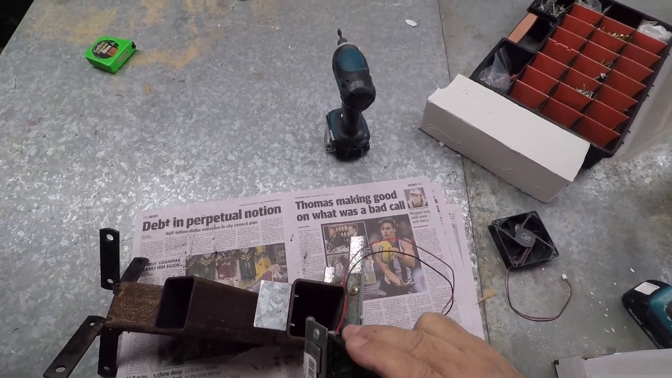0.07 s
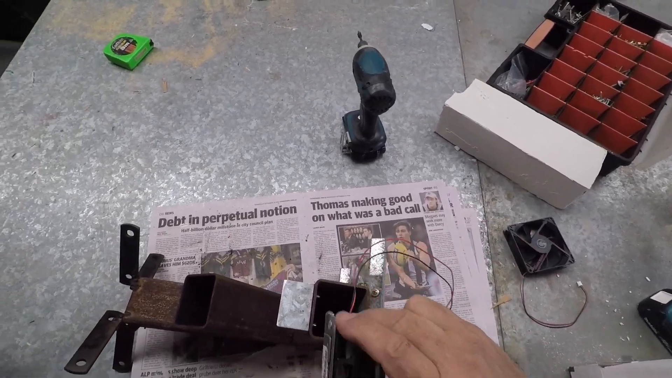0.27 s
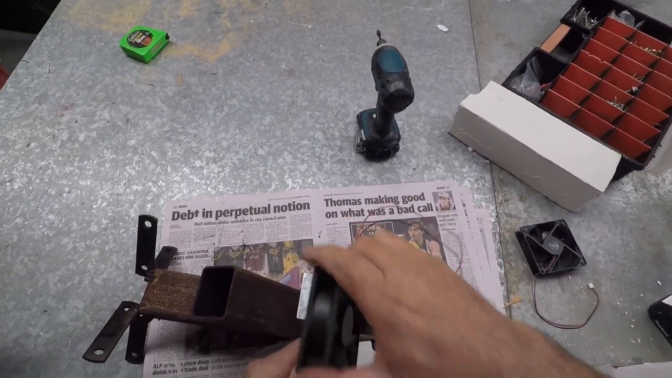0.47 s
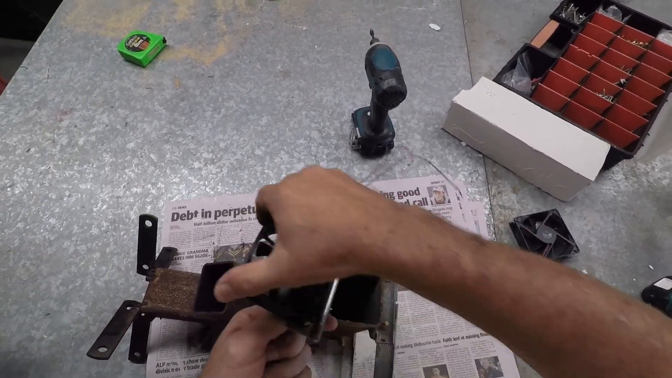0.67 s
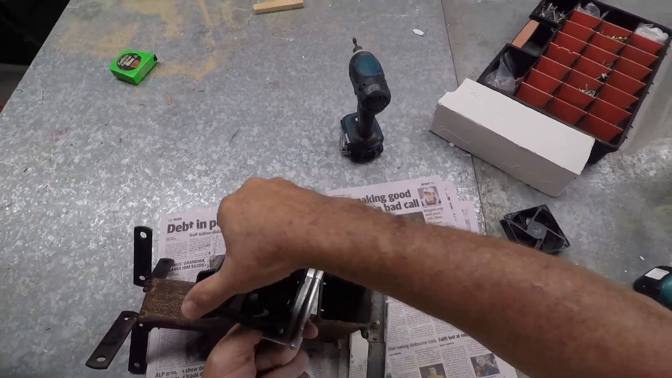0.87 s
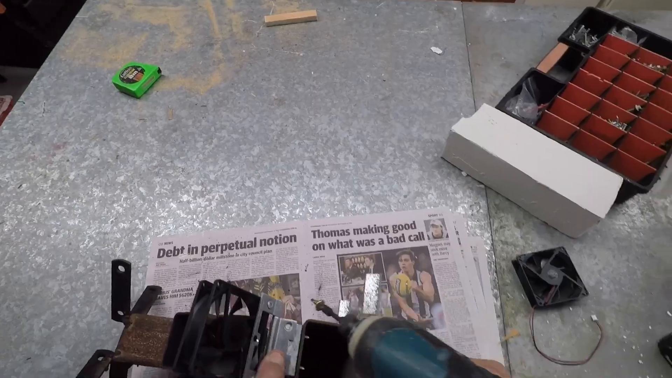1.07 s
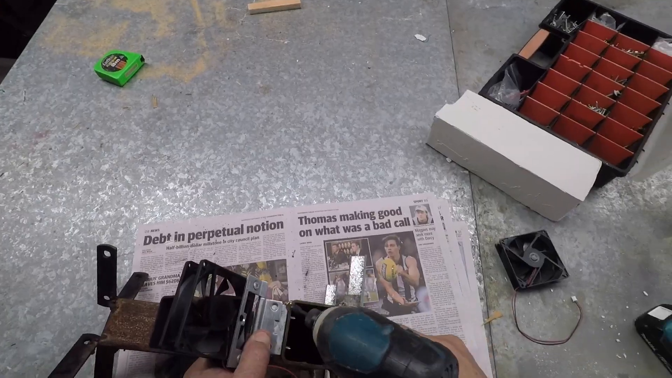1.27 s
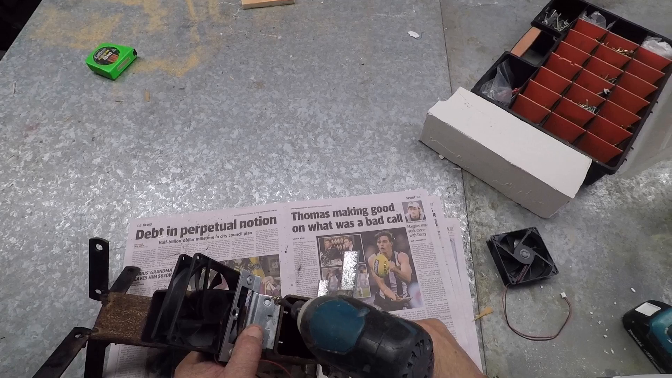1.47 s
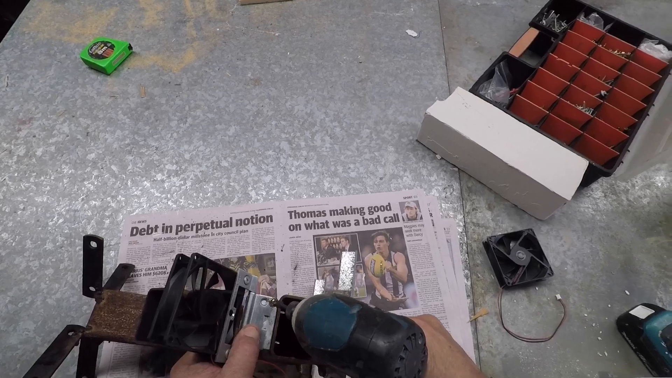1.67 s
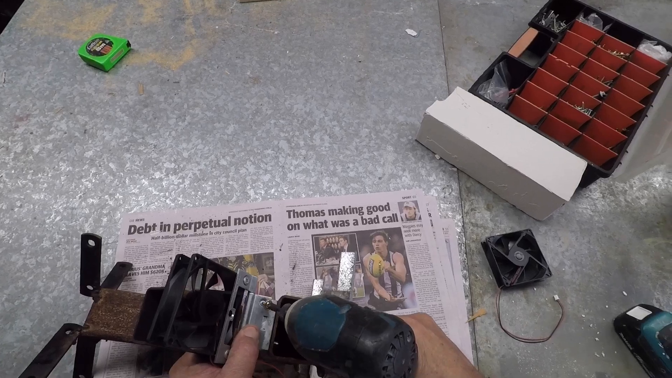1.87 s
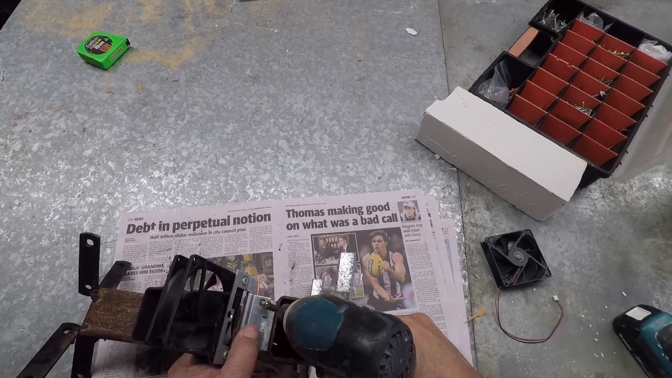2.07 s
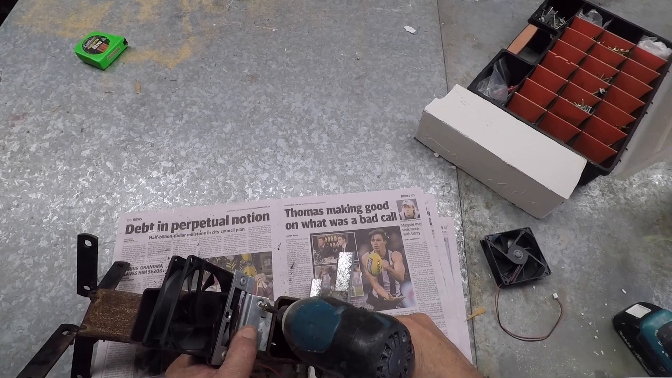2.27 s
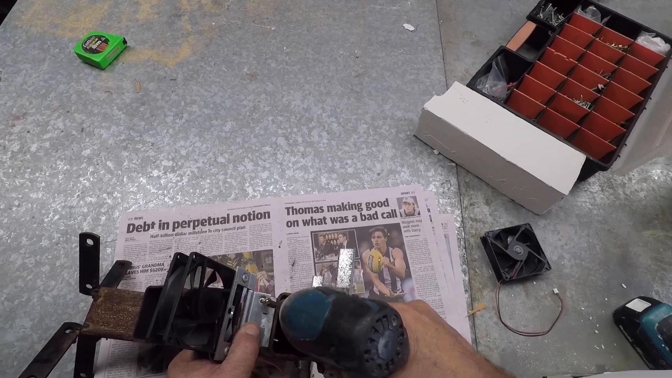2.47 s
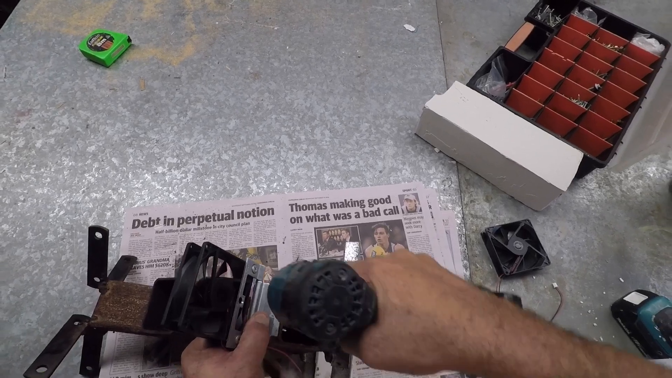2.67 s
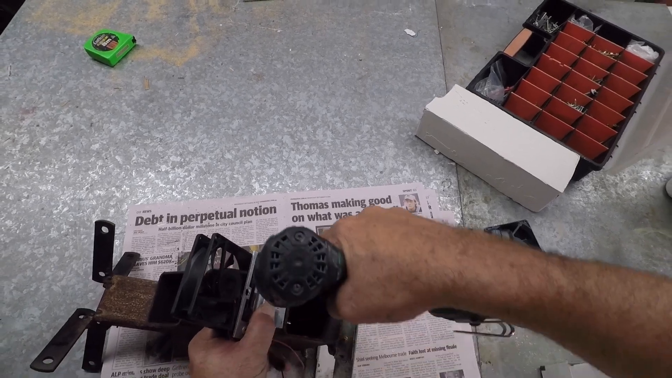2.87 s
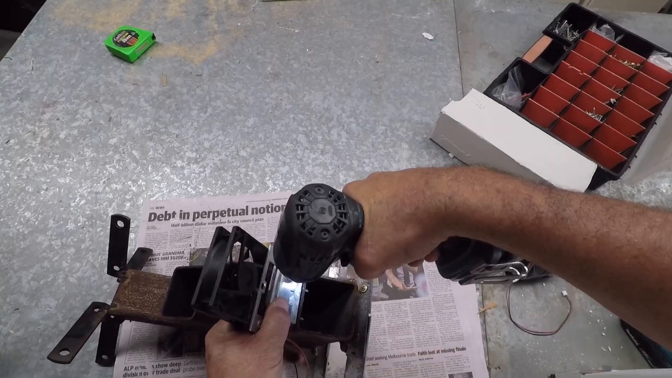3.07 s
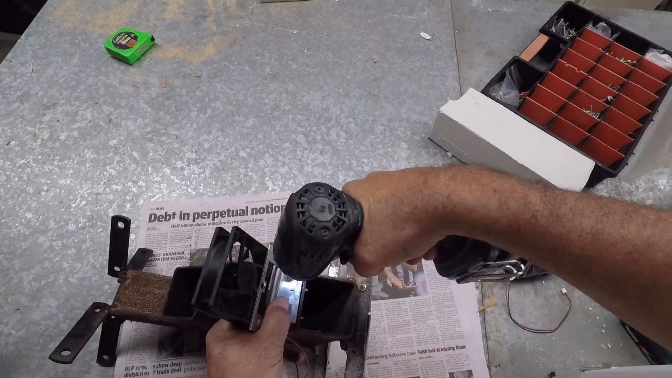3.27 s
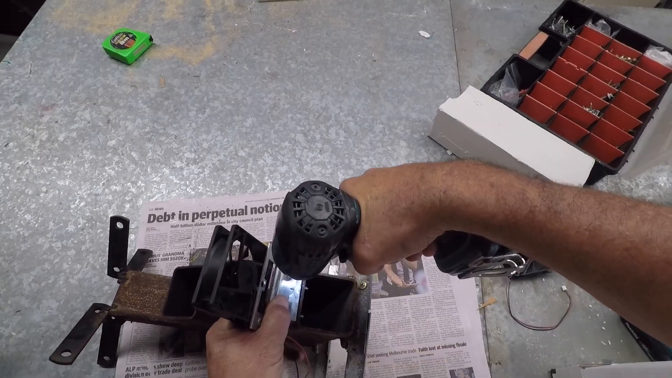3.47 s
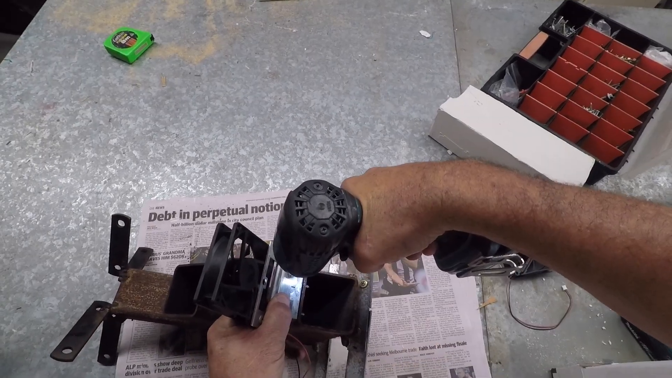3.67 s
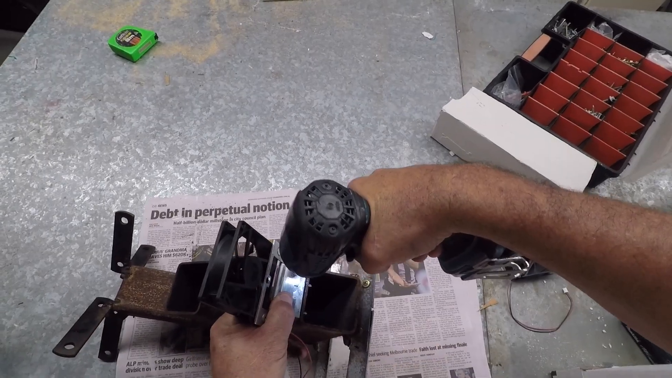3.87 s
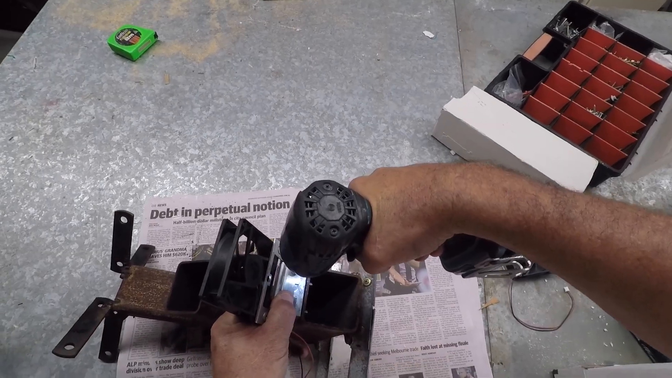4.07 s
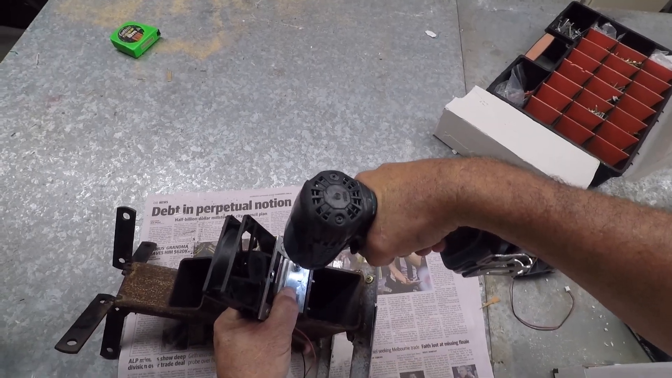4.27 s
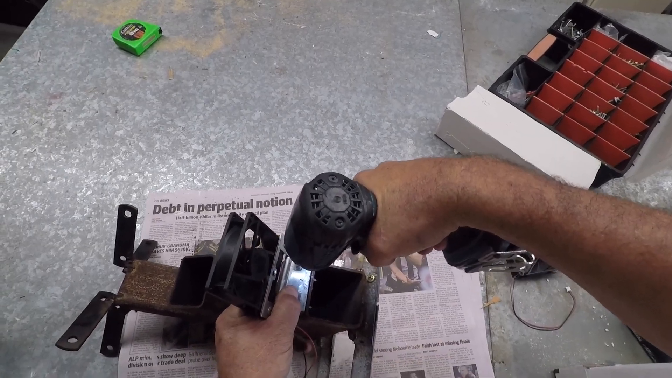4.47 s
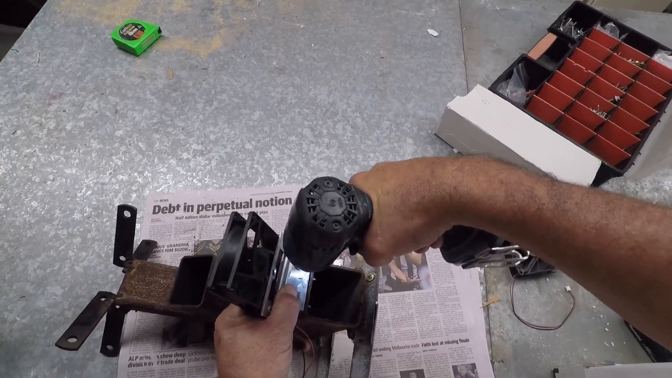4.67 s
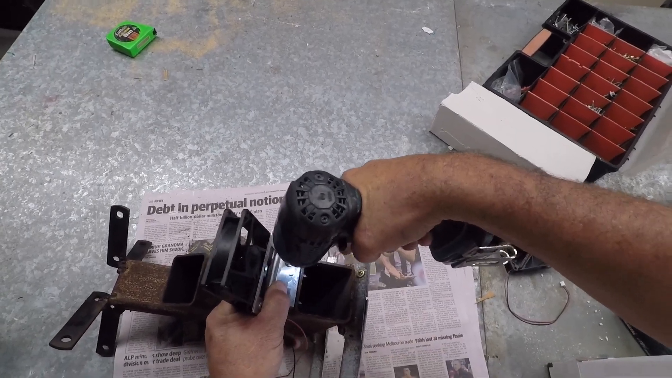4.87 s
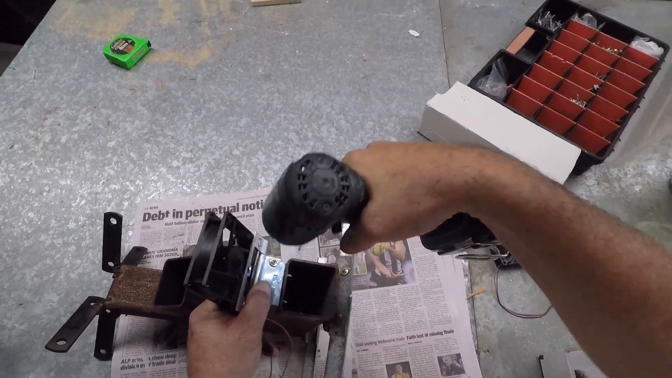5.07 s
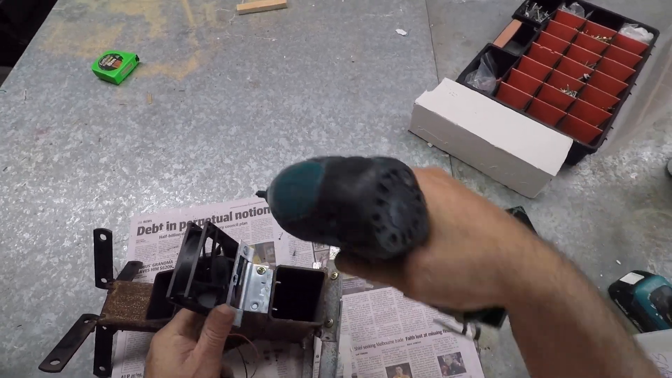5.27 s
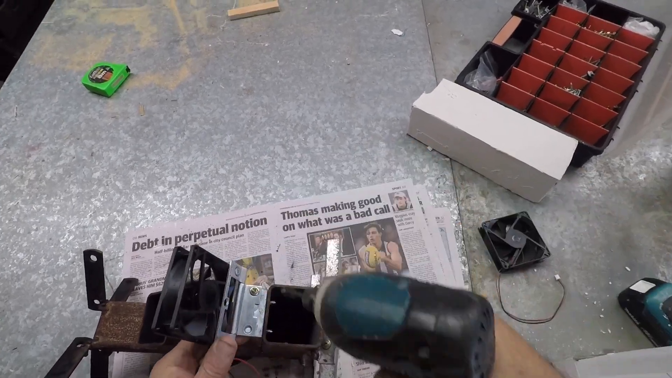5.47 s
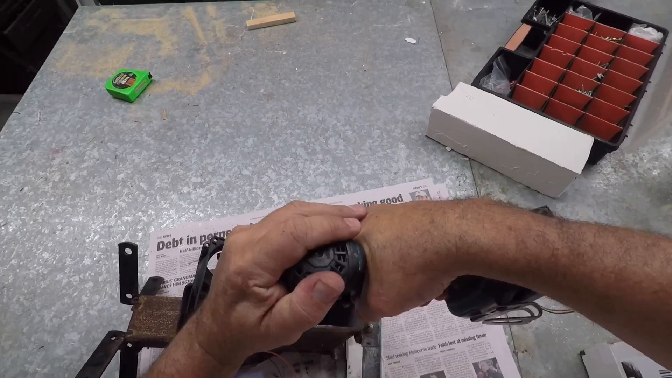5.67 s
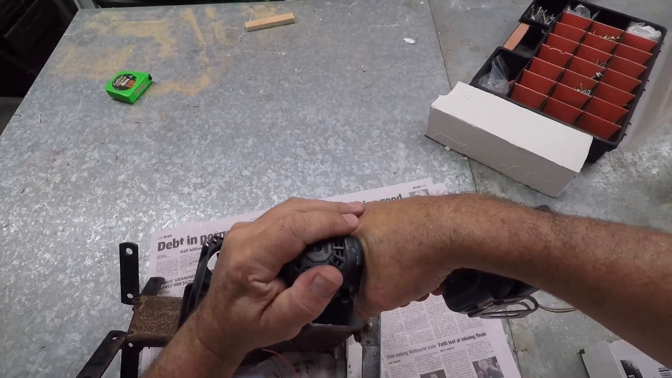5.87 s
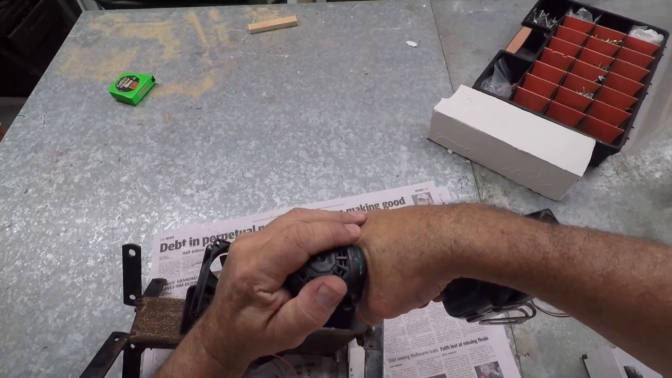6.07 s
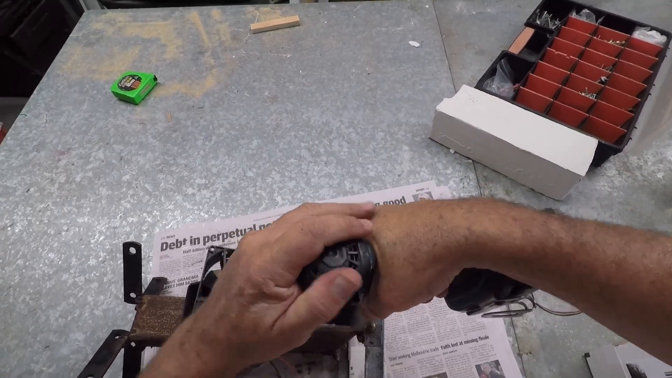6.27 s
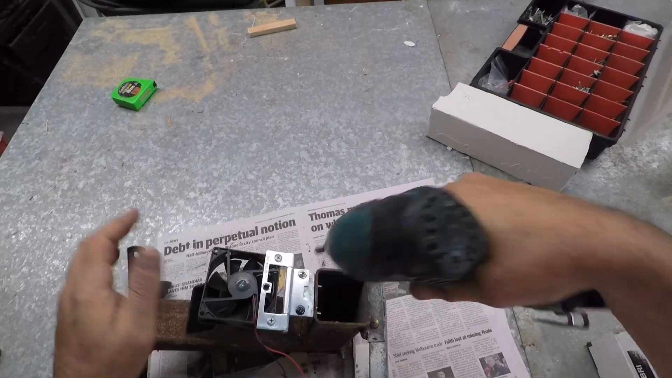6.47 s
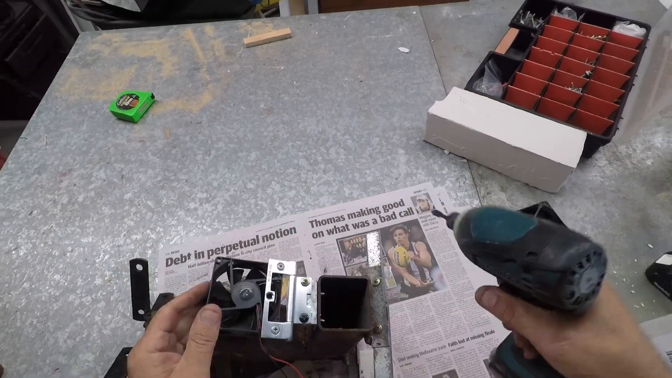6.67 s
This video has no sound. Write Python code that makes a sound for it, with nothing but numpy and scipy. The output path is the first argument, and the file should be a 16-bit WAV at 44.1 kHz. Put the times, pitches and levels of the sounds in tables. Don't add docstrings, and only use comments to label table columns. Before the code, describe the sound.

Soft workshop hum and faint hiss lie alone until about 0.95 seconds, when a steel latch touches and snaps shut, bright and short, cut by a quick dip in sound. Hum continues with tiny ticks near 1.9 and 2.2 seconds. At 3.0, after another brief fade, the air grows duller and closer and a cordless driver whines: steady planetary gear tones over gritty rattle and low bench rumble. Its pitch slowly sinks, sagging more as the screw binds around 4.5. From 4.6 to 4.85 the clutch slips in about ten rapid snaps, bracket knocks and deep bench thumps, then stops. Light taps fill the pause, one clearer near 5.55. After a fade at 5.6 a second, lower, rougher run begins, sags, catches around 5.9 and rises, then ends in heavy, duller clutch clacks from 6.1 to 6.25. Short echoes die away; a few faint metallic taps follow until 6.7.

```python
import sys
import numpy as np
from scipy import signal
from scipy.fft import rfft, irfft, next_fast_len
from scipy.io import wavfile
from scipy.ndimage import uniform_filter1d

SR = 44100
rng = np.random.default_rng(int(sys.argv[2]) if len(sys.argv) > 2 else 0)


def unload_audio(sound):
    columns = np.transpose(np.atleast_2d(sound))
    steps = np.round(np.clip(columns, -1, 1) * 32767)
    wavfile.write(sys.argv[1], SR, steps.astype(np.int16))


def linear_from_db(decibels):
    return 10 ** (np.asarray(decibels, float) / 20)


N = 296307
T = np.arange(N) / SR

CUTS = [.984, 2.983, 5.583]
# [time_s, snap_db, bench_thump_db, bracket_knock_db, knock_pitch_hz]
SLIPS = [(4.5898, -22.5, -22, -27, 1490), (4.602, -20, -13, -26, 1340), (4.6297, -22, -15, -20, 1820),
         (4.6558, -22, -15.5, -27, 1670), (4.683, -22.5, -23, -26, 1810),
         (4.7096, -22.5, -15.5, -29.5, 1760), (4.7335, -21.5, -13.5, -31, 2000),
         (4.765, -24, -9, -22, 1758), (4.795, -22.5, -13.5, -15, 1652), (4.833, -30.5, -12.5, -23, 1890)]
SLIPS_AGAIN = [(5.916, -31, -24, -23, 2190), (5.9608, -47, -26, -41, 1210),
               (6.0774, -18.5, -11, -13.5, 1550), (6.1043, -21, -15.5, -14, 1832),
               (6.1293, -21, -13, -17.5, 1460), (6.153, -22, -20, -12.5, 1520),
               (6.1795, -20, -9.5, -14.5, 1195), (6.2032, -49, -12, -15.5, 1370),
               (6.2343, -30.5, -8.5, -12, 1574)]
# [frequency_hz, density_db]
SNAP = [(180, -49), (300, -2), (544, -19), (631, -6), (1110, -4), (1470, 3.5), (2250, -4), (4160, 1),
        (4820, -4.5), (5880, -1.5), (11400, -38), (13400, -16), (15600, -53)]
# [frequency_hz, width_hz, gain_db]
PORT = [(11450, 520, -13.5), (12100, 660, 5.5), (13700, 700, 3.5), (14900, 1200, 3)]


def evened(x):
    return x / np.sqrt(np.mean(x ** 2) + 1e-20)


def read(points, hz):
    f, value = np.transpose(points)
    return np.interp(np.log(hz + 1), np.log(f + 1), value)


def add(mix, s, sound):
    part = mix[round(s * SR):][:len(sound)]
    part += sound[:len(part)]


def humped(hz, humps):
    return sum(top / (1 + (2 * (hz - f) / width) ** 2) for f, width, top in humps)


def colour(x, points, humps=()):
    size = next_fast_len(len(x))
    hz = np.fft.rfftfreq(size, 1 / SR)
    db = read(points, hz) + humped(hz, humps)
    return evened(irfft(rfft(x, size) * linear_from_db(db), size)[:len(x)])


def drift(size, hz):
    return evened(signal.lfilter([1], [1, -np.exp(-2 * np.pi * hz / SR)], rng.standard_normal(size)))


def ring(modes, detune, seconds):
    t = np.arange(round(seconds * SR)) / SR
    out = np.zeros(len(t))
    for (hz, db, t60), off in zip(modes, detune):
        out += linear_from_db(db - 60 * t / t60) * np.sin(2 * np.pi * hz * off * t)
    return out


def room(x):
    # [frequency_hz, t60_s]
    shop = [(100, 0.52), (500, 0.42), (2000, 0.41), (8000, 0.31), (11000, 0.35), (14000, 0.29)]
    echoes = np.zeros(SR)
    at = np.arange(200, SR - 20, 20)
    echoes[at + rng.integers(0, 20, len(at))] = rng.choice([-1., 1.], len(at))
    hz, t, z = signal.stft(echoes, SR, nperseg=256)
    fall = linear_from_db(-60 * t / read(shop, hz)[:, None])
    tail = signal.istft(z * fall, SR, nperseg=256)[1]
    return signal.fftconvolve(x, tail / np.linalg.norm(tail))[:N]


def workshop():
    # [frequency_hz, density_db]
    hum_colour = [(20, -34), (106, -33), (135, -1), (200, 0), (310, -7), (500, -13.5), (1000, -20.5),
                  (2000, -25.5), (3300, -34), (6500, -36), (8500, -33), (10500, -34), (13000, -41),
                  (15500, -50)]
    # [frequency_hz, density_db]
    close_colour = [(59, -25.5), (100, 0.5), (166, -16), (313, -14.5), (370, -21), (420, -21.5), (697, -30),
                    (936, -29), (1520, -31.5), (2470, -39), (4660, -41), (6660, -51.5), (15500, -67)]
    # [frequency_hz, width_hz, gain_db]
    steel = [(1500, 150, 5), (1830, 60, 8), (2200, 150, 4), (3000, 160, 9), (3800, 150, 4), (4650, 200, 8)]
    sway_db = [-62.5, -85, -42, -37]
    # [time_s, level_db, rise_s, fall_s]
    leans = [
        (0.97, -57, .03, .02),
        (2.97, -70, .06, .05),
        (3.1, -37, 0.056, .06),
        (4.5, -32, 0.34, 0.084),
        (4.73, -23, 0.031, .05),
        (5.3, -43, 0.062, 0.054),
        (5.95, -36, 0.09, 0.06),
    ]
    hum = linear_from_db(-48.5 + 0.51 * drift(N, 3.2)) * colour(rng.standard_normal(N), hum_colour)
    close = linear_from_db(-43 + 0.92 * drift(N, 7.3)) * colour(rng.standard_normal(N), close_colour, steel)
    sway = colour(rng.standard_normal(N), [(12, 0.0), (25, 0.5), (80, -1), (120, -17.5), (200, -53)])
    level = linear_from_db(np.take(sway_db, np.searchsorted(CUTS, T)))
    for s, db, rise, fall in leans:
        level = level + linear_from_db(db) * np.exp(-abs(T - s) / np.where(T < s, rise, fall))
    sway *= level * linear_from_db(2.6 * drift(N, 1.8))
    return np.where(T < CUTS[1], hum, close) + sway


def small_parts():
    # [frequency_hz, level_db, t60_s]
    latch_modes = [(1150, -9, 0.15), (1830, -2, 0.19), (2680, -15, 0.32), (3660, -5, 0.26),
                   (5520, 1, 0.086), (6200, -16, 5.0), (7820, -10, 0.012), (10100, -13, 0.032),
                   (12510, -14, 0.059)]
    # [time_s, level_db]
    latch_hits = [
        (0.9498, -44),
        (0.9612, -17),
    ]
    # [time_s, level_db, pitch_hz]
    tap_hits = [(1.9052, -38, 4200), (2.167, -53, 1510), (2.9602, -44, 4200), (5.0205, -42, 1860),
                (5.0734, -36.5, 1510), (5.4041, -47, 2050), (5.5627, -28.5, 1970), (6.354, -36, 1440),
                (6.421, -35.5, 1260), (6.5117, -42, 1420), (6.6708, -40.5, 1560)]
    latch, taps = np.zeros(N), np.zeros(N)
    t = np.arange(round(.04 * SR)) / SR
    for s, db in latch_hits:
        grit = colour(rng.standard_normal(len(t)), SNAP, [(1400, 630, -8), (10500, 2200, 16), (14500, 2000, 16)])
        grit *= np.exp(-t / 0.065)
        tone = ring(latch_modes, rng.uniform(0.96, 1.01, 9), .04)
        onset = 1 - np.exp(-t / 0.00042)
        add(latch, s, (linear_from_db(db - 4.5) * tone + linear_from_db(db - 8.0) * grit) * onset)
    for s, db, hz in tap_hits:
        grit = colour(rng.standard_normal(len(t)), SNAP) * np.exp(-t / .006)
        tone = (1500 / hz) ** 2 * np.sin(2 * np.pi * hz * t) * np.exp(-t / .004)
        onset = 1 - np.exp(-t / .0004)
        add(taps, s, linear_from_db(db - 1.5) * (.35 * grit + 1.2 * tone) * onset)
    add(taps, .99, linear_from_db(-68) * ring([(3700, 0, .6), (3790, -2, .5), (3860, -5, .4)], [1, 1, 1], .3))
    return latch * (T < CUTS[0]), taps


def clutch():
    # [frequency_hz, level_db, t60_s]
    bench = [(74.6, -10, 0.099), (109.5, -0.5, 0.24), (145.4, 3, 0.2), (185, -7.5, 0.13),
             (249, -3.5, 0.075), (399.5, -4.5, .08), (529, 1.5, 0.033)]
    # [ratio to the knock pitch, level_db, t60_s]
    bracket = [(.42, -4, .03), (.55, -4, .025), (1., 0, .014), (2.4, -4, .012), (2.9, -3, .015)]
    snap_colour = [(3000, -19), (8000, 2.5), (11400, -6.5), (13800, -4.5), (15600, -3.5)]
    out, t = np.zeros(N), np.arange(round(0.029 * SR)) / SR
    for s, snap_db, thump_db, knock_db, hz in SLIPS + SLIPS_AGAIN:
        snap = colour(rng.standard_normal(len(t)), snap_colour, PORT) * np.exp(-t / .003)
        palm_db = -4 * (s > CUTS[2])
        add(out, s, linear_from_db(snap_db + 1.5 + palm_db) * snap)
        scrape = colour(rng.standard_normal(len(t)), SNAP, PORT)
        scrape *= (1 - np.exp(-t / .003)) * np.exp(-t / .008)
        add(out, s - .005, linear_from_db(snap_db + 13.5) * scrape)
        knock = ring(bracket, hz * rng.uniform(0.94, 1.04, 5), 0.069)
        add(out, s - .0045, linear_from_db(knock_db + 3.5) * knock)
        u = ((t - .008) / 0.0021) ** 2
        add(out, s - .005, linear_from_db(thump_db + 1) * (1 - 2 * u) * np.exp(-u))
        add(out, s - .004, linear_from_db(thump_db - 9) * ring(bench, rng.uniform(0.92, 1.149, 7), .4))
    return out


def driver(k):
    # [time_s, ring_mesh_hz, gear_load_db]
    runs = [
        [(2.983, 1452, -6), (3.2, 1428, -4), (3.75, 1413, -3), (3.9, 1386, -1), (4.2, 1367, 1.5),
         (4.3, 1355, 0), (4.45, 1333, 1), (4.52, 1253, 0), (4.58, 1217, -3)],
        [(5.583, 1056, -4.5), (5.72, 1008, -4), (5.82, 978, -5), (5.895, 909.6, -0.5), (5.915, 1060, -5),
         (5.95, 1054, 0), (5.975, 1212, 3.5), (6.0, 1264, 2.5), (6.06, 1238, 3)],
    ]
    # [ring_tone_db, sun_tone_db, tooth_rattle_db, bench_rumble_db]
    levels = [
        (-32.5, -32.5, -18.5, -26),
        (-34.5, -36.5, -20.5, -28.5),
    ]
    # [trigger_off_s, end_s, rattle_db, judder_above_thumps_db]
    slipping = [
        (4.79, 4.86, -19, 6),
        (6.215, 6.26, -17, 4),
    ]
    ring_load = [0.092, .6]
    sun_load = [1, 1.8]
    rattle_load = [0.096, 0.34]
    bite_load = [-0.089, -.2]
    waver = [.0015, .005]
    grind_db = [24, 14]
    ring_harmonics = [(0, -13, -10, -24, -32, -40, -42, -40), (-1, 1, 1, 1, -5, -4, -22, -13)]
    ring_throb = [.45, 1., .9, .9, .7, .7, .7, .6]
    ring_fuzz = [(-8, -7, -2, -10, -13, -21, -27, -26), (-4, -2, -2, -1, -5, -5, -18, -11)]
    sun_harmonics = [(-1, 2.5, -1, -28, -23, -18, -36, -40), (0, 2, -2, -10, -24, -24, -24, -14)]
    # [frequency_hz, width_hz, gain_db]
    whine = [(2120, 200, 3), (4520, 500, 6), (6750, 700, 5), (10000, 500, 13), (12500, 800, 6)]
    # [frequency_hz, density_db]
    housings = [
        [(150, -51), (250, -16.5), (614, -12), (1030, -18), (1380, -9), (1730, -9), (2200, -12.5),
         (2400, -13.5), (4390, -2.5), (5130, -6.5), (6540, -3), (7640, -20.5), (11400, -25), (13300, -19),
         (15500, -27)],
        [(150, -43), (250, -33), (335, -18), (781, -10.5), (995, -9.5), (1410, -5), (1990, -3), (2280, -5.5),
         (2900, -8.5), (3450, -12), (4170, 2), (6210, -4), (11400, -25.5), (12600, -14.5), (15500, -29)],
    ]
    # [frequency_hz, width_hz, gain_db]
    shell = [(620, 150, 6), (1400, 300, 3), (2000, 400, 3), (2850, 200, 4), (3430, 250, 7), (4200, 400, 2),
             (10000, 500, 4)]
    chuck_harmonics = [(-8.5, -4.5, -7, -11.5, -2, -6.5, -14.5, -11.5),
                       (-2, -9, -6, -11, -8, -8, -8.5, -12)]
    # [frequency_hz, width_hz, gain_db]
    sheet = [(140.6, 6, 6.5), (27.1, 2, 8)]
    # [frequency_hz, density_db]
    rumble_colour = [(8.8, -40), (15, -4), (38, -11), (86, 3.5), (145, 7.5), (231, -3.5), (265, -12.5),
                     (400, -11), (520, -83), (880, -120)]
    # [frequency_hz, density_db]
    judder_colour = [(40, -28), (75, -2), (110, 4), (150, -2.5), (200, -7), (300, -21), (700, -20.5),
                     (1000, -62)]
    # [time_s, level_db, width_s]
    strains = [
        (4.46, 6.5, 0.073),
        (5.935, 7, 0.017),
        (4.14, 0, .1),
    ]
    ring_teeth, sun_ratio, shaft_ratio = 51, 1.594, .16

    s, hz, load_db = np.transpose(runs[k])
    ring_db, sun_db, rattle_db, rumble_db = levels[k]
    off_s, end_s, slip_db, judder_db = slipping[k]
    slips = np.array([row for row in SLIPS + SLIPS_AGAIN if s[-1] < row[0] < end_s])
    t = np.arange(s[0], end_s, 1 / SR)
    size = len(t)
    load, speed = np.interp(t, s, load_db), np.interp(t, s, hz)
    unsteady = 1 + waver[k] * drift(size, 60) + .0045 * drift(size, 12)
    turns = np.cumsum(speed * unsteady) / SR
    chuck = 2 * np.pi * turns / ring_teeth
    shaft = 2 * np.pi * shaft_ratio * turns
    meshing = np.clip((s[-1] + 0.019 - t) / 0.0077, 0, 1)
    caught = np.clip((t - s[-1]) / 0.022, 0, 1)
    stop = np.clip((t[-1] - t) / 0.036, 0, 1)

    def blur():
        return evened(uniform_filter1d(drift(size, 87), 60))

    ring_gear = np.zeros(size)
    for h, (db, depth, fuzz_db) in enumerate(zip(ring_harmonics[k], ring_throb, ring_fuzz[k])):
        throb = linear_from_db(db + 0.6 * drift(size, 34)) * (1 + depth * np.cos(2 * chuck + h))
        harden = linear_from_db(min(h, 2) * grind_db[k] * (1 - speed / hz[0]))
        ring_gear += (throb + linear_from_db(fuzz_db) * blur()) * harden * np.cos(2 * np.pi * (h + 1) * turns)

    sun_gear = np.zeros(size)
    for h, db in enumerate(sun_harmonics[k]):
        level_db = db + bite_load[k] * h * load + humped((h + 1) * sun_ratio * speed, whine)
        throb = 1 + 0.14 * np.cos(shaft + h) + 0.14 * np.cos(2 * chuck + h)
        swell = linear_from_db(1.9 * drift(size, 37)) * throb + linear_from_db(-11.5) * blur()
        sun_gear += linear_from_db(level_db) * swell * np.cos(2 * np.pi * (h + 1) * sun_ratio * turns)

    tones = linear_from_db(ring_db + ring_load[k] * load + 4) * ring_gear
    tones += linear_from_db(sun_db + sun_load[k] * load + 3.0) * sun_gear

    beat = (1 + .25 * np.cos(shaft) + .15 * np.cos(2 * shaft)) * (1 + .15 * np.cos(chuck))
    teeth = rng.standard_normal(size) * linear_from_db(1.46 * drift(size, 480)) * beat
    rattle_db = (1 - caught) * (rattle_db + rattle_load[k] * load) + caught * slip_db
    rattle_db = rattle_db - 300 * np.maximum(t - off_s, 0)
    rattle = linear_from_db(rattle_db - 6.0 + 2.94 * meshing) * colour(teeth, housings[k], shell + PORT)

    wobble = np.zeros(size)
    for h, db in enumerate(chuck_harmonics[k]):
        level_db = db + 2 * drift(size, 3.4) + humped((h + 1) * speed / ring_teeth, sheet)
        wobble += linear_from_db(level_db) * np.cos((h + 1) * chuck + 0.45 * h)
    shake = meshing * colour(rng.standard_normal(size), rumble_colour)
    shake += (1 - meshing) * colour(rng.standard_normal(size), judder_colour)
    for at, db, width in strains:
        rumble_db = rumble_db + db * np.exp(-((t - at) / width) ** 2)
    thumps_db = np.interp(t, slips[:, 0], slips[:, 2])
    rumble_db = (1 - caught) * rumble_db + caught * (judder_db + thumps_db)
    rumble = linear_from_db(rumble_db) * (linear_from_db(-3.5) * meshing * wobble + linear_from_db(-7.5) * shake)
    return s[0], meshing * tones + rumble * stop, rattle * stop


def scene():
    clatter, held = clutch(), np.zeros(N)
    for k in range(2):
        s, tones, noise = driver(k)
        add(held, s, tones)
        add(clatter, s, noise)
    latch, taps = small_parts()
    wet = room(linear_from_db(-5) * clatter + linear_from_db(-13) * held + linear_from_db(-8) * taps)
    return np.tile(clatter + held + latch + taps + wet + workshop(), (2, 1))


def low_pass(x):
    return signal.sosfilt(signal.butter(12, 15750, fs=SR, output="sos"), x)


def record(dry):
    fade_s = .033
    x = dry[0] * np.min([np.clip(abs(T - s) / fade_s, 0, 1) for s in CUTS], axis=0)
    x = np.tanh(x)
    x = signal.oaconvolve(x, signal.firwin(1501, 15290, window=("kaiser", 8), fs=SR), "same")
    high = signal.cheby2(12, 70, 11500, "high", fs=SR, output="sos")
    scramble = evened(uniform_filter1d(drift(N, 60), 150))
    side = linear_from_db(-4) * signal.sosfilt(high, signal.sosfilt(high, x) * scramble)
    return low_pass(np.array([x + side, x - side]))


dry = scene()
out = record(dry)
unload_audio(out)
```